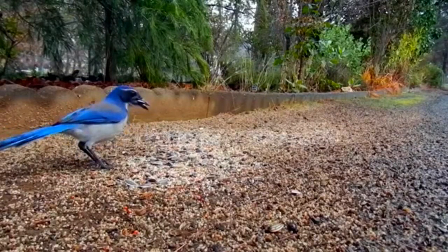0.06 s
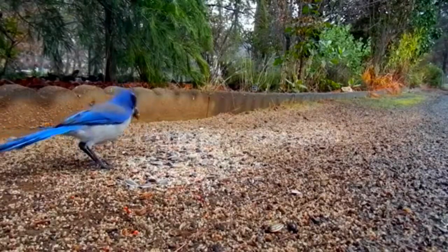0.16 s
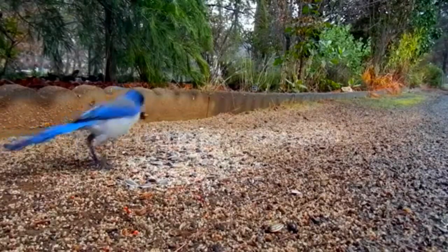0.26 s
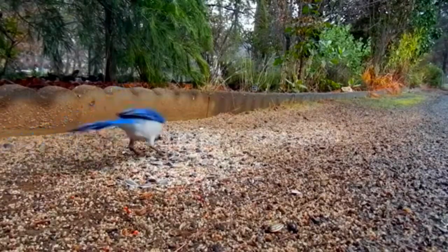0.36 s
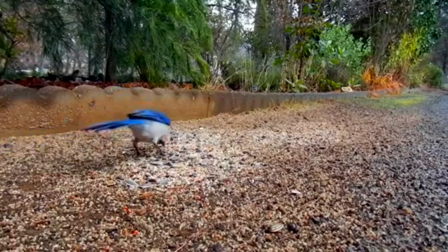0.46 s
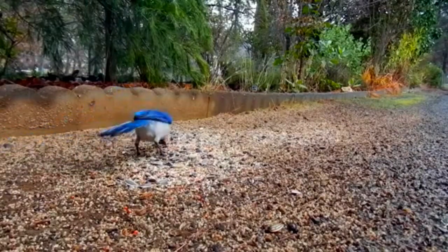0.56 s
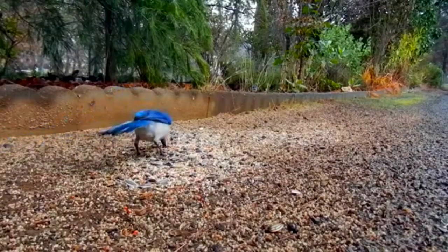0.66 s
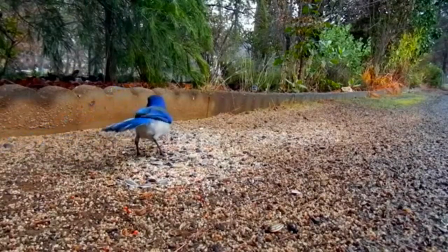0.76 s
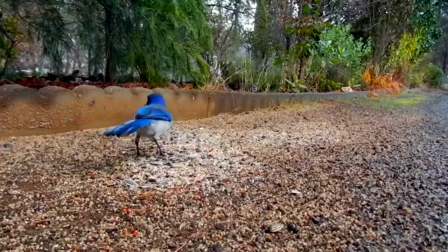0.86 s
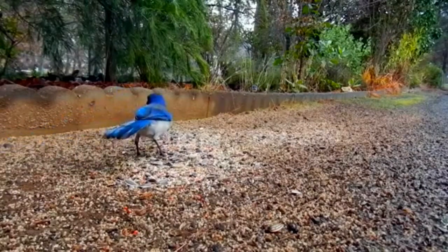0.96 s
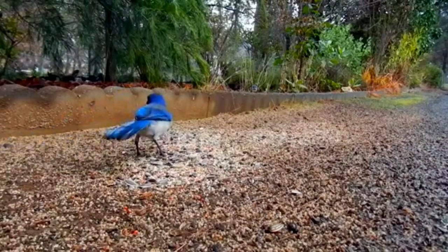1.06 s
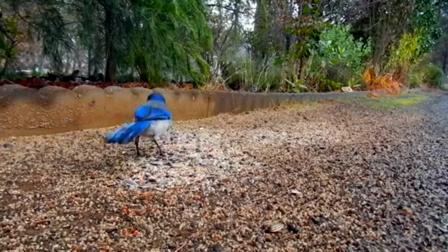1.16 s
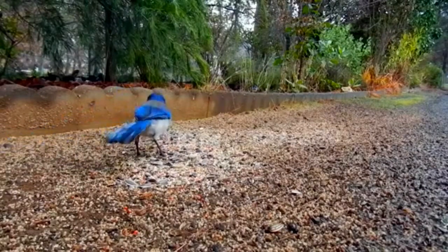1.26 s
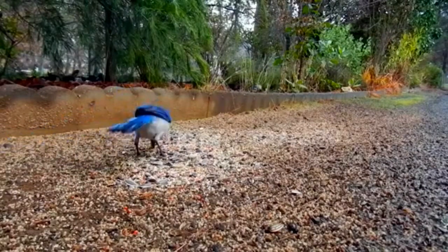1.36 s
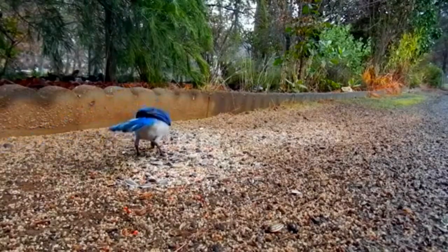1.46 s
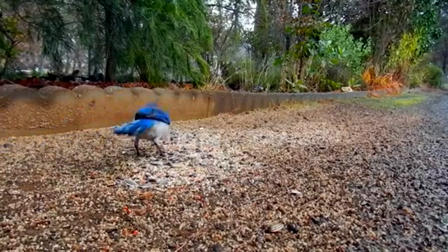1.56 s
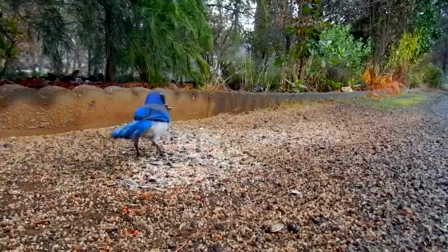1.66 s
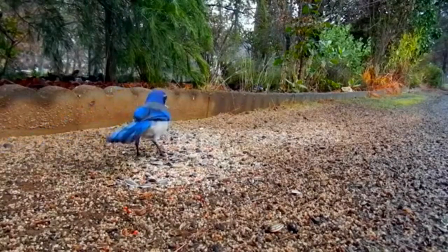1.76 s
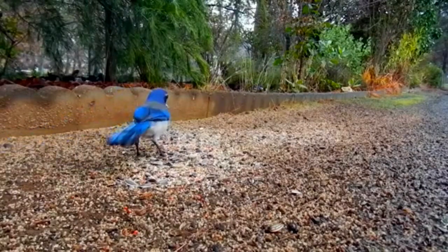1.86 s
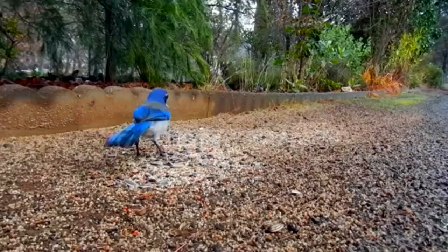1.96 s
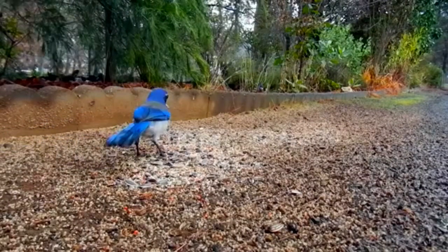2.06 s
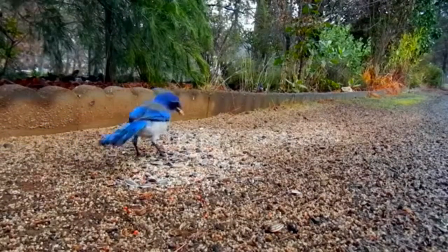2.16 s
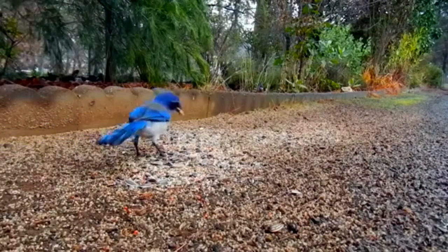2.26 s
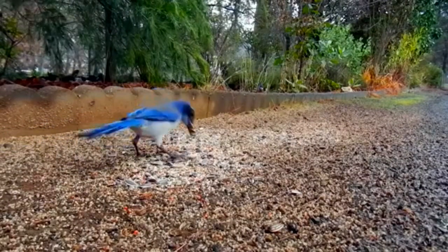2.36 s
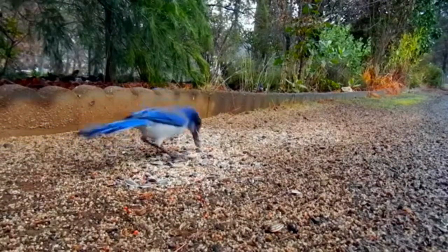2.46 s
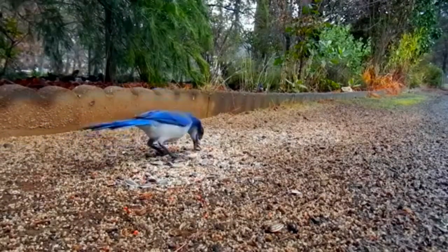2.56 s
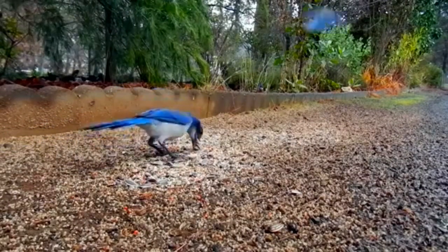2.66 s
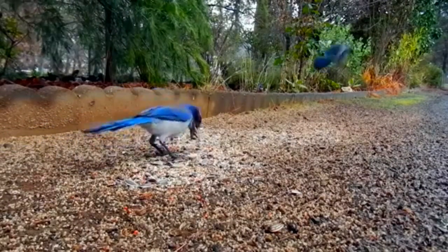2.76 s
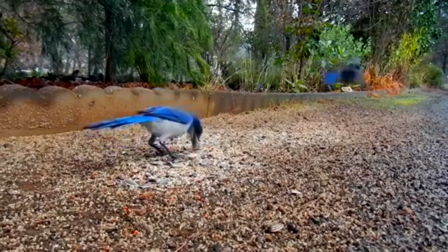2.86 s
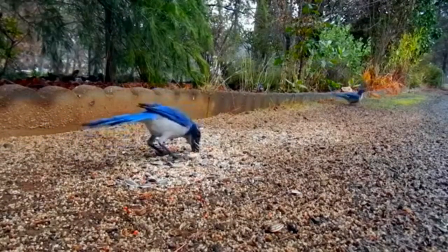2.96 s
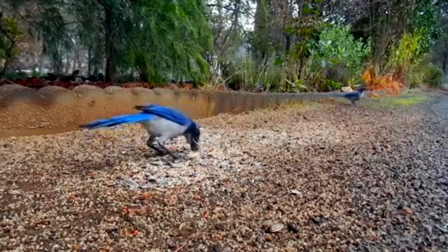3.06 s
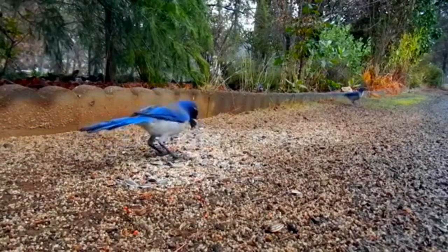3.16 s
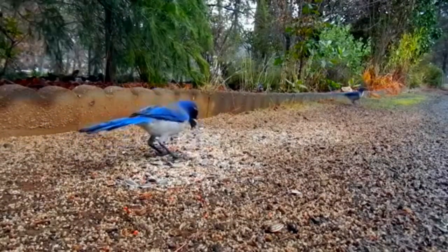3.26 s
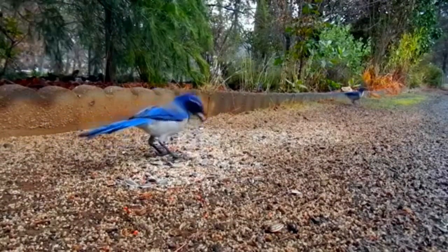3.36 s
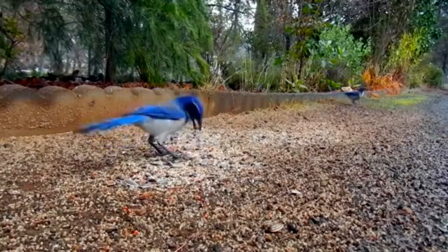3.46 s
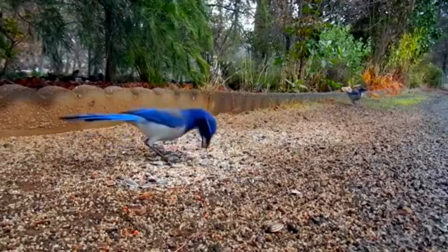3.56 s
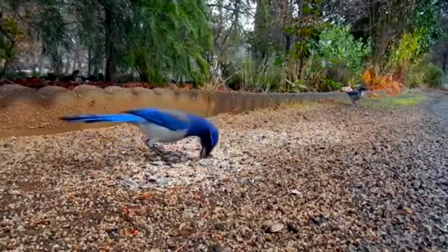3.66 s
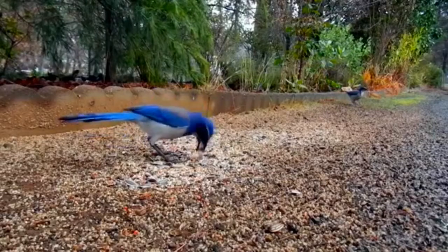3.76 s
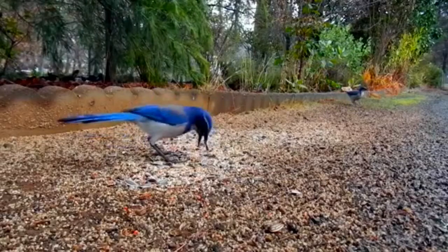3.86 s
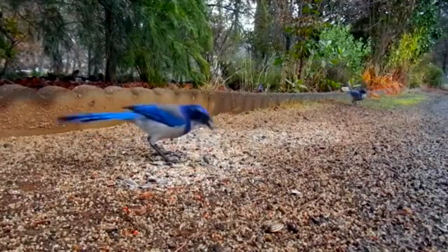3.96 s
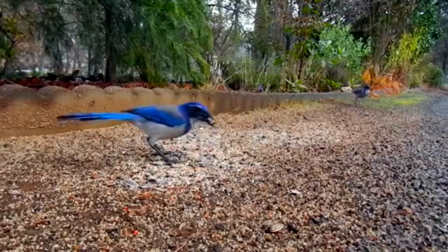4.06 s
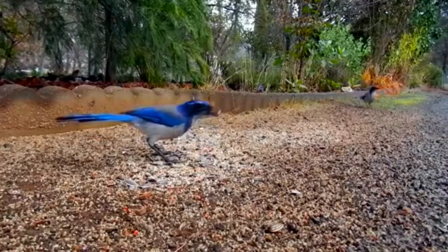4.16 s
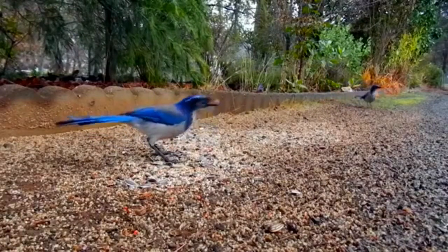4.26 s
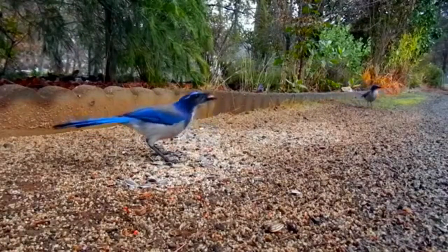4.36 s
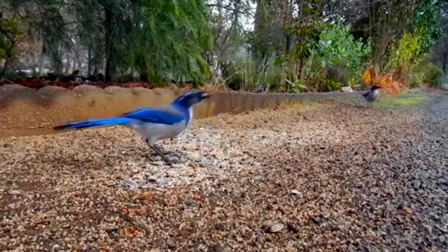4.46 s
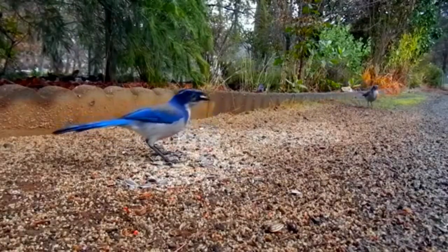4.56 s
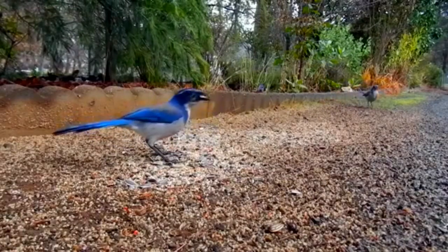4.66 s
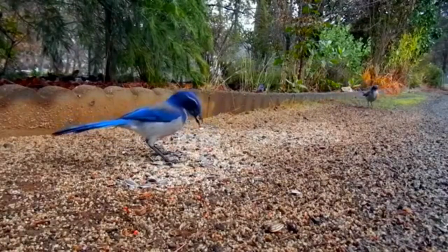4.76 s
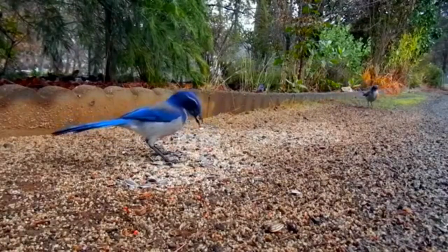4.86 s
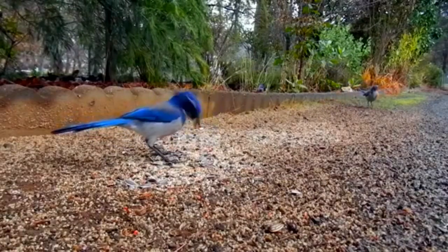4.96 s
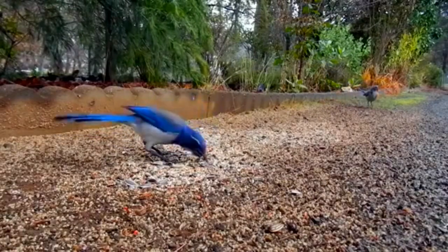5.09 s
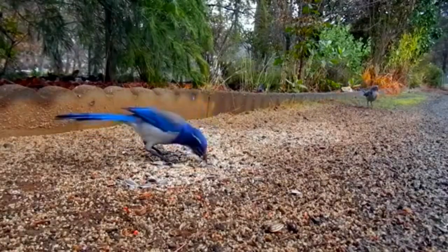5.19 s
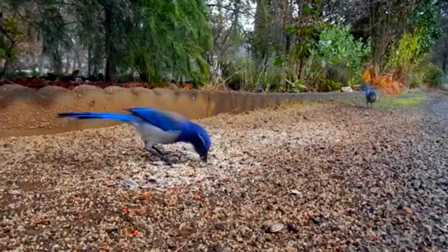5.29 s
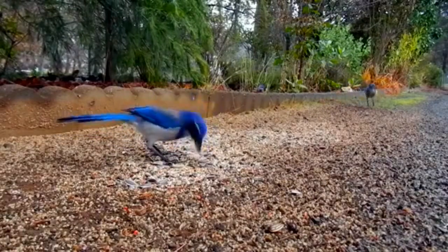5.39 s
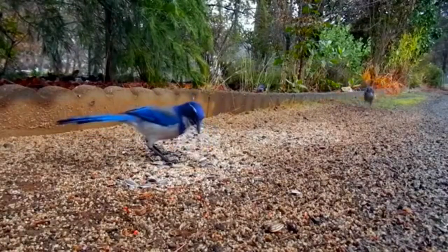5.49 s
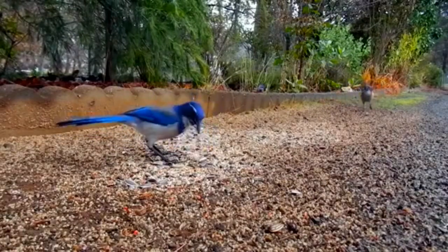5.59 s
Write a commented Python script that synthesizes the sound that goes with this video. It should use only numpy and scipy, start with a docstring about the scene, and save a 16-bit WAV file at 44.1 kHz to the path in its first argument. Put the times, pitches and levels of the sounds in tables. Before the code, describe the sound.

A small camera sits close to fine gravel outdoors, giving a thin stereo sound without bass or extreme treble. A steady wash of far traffic, faint rustle and camera hiss lasts about 5.6 seconds, swelling only slightly. After a quiet start, a jay's beak makes crisp, dry clicks from 0.4 to 0.8 seconds, slightly left, each with a tiny crunch of grit. A faint pip comes near 0.9. Another peck lands at 1.5, followed by small rising chips until 1.8. Loose grit shifts softly from 2.0 to 2.3, then clicks resume at 2.4 to 2.6, with a strong one at 2.9 and more at 3.1. Very high quick whistles with a hazy echo occur around 3.5. A busy flurry of ticks follows at 3.7, then scattered ones to 4.6. After a pause, a final tight cluster snaps at 5.2, now slightly right, leaving only background.

```python
"""On fine gravel, close to a small camera, a jay pecks seeds. Its beak clicks on stones and husks, made of
snaps, short damped rings and rough cracks, while swarms of tiny grains make the loose grit crunch.
Small birds in the trees give thin high whistles, made of sines, with a hazy, fluttering echo of noise bands.
Far traffic roars dully over a soft rustle, both shaped noise. The camera adds hiss and cuts bass and top."""
import sys
import numpy as np
from scipy import signal
from scipy.fft import rfft, irfft, next_fast_len
from scipy.io import wavfile
from scipy.ndimage import uniform_filter1d

SR = 44100
rng = np.random.default_rng(int(sys.argv[2]) if len(sys.argv) > 2 else 0)


def pcm_store(signal):
    """Save signal as 16-bit PCM."""
    levels = np.round(np.clip(np.atleast_2d(signal), -1, 1) * 32767)
    wavfile.write(sys.argv[1], SR, levels.astype(np.int16).T)


N = 248283  # length in samples

# Beak and stone contacts. Each row: start in seconds, peak level in dB before panning, ring pitch in Hz.
CONTACTS = [(.4178, -38, 2600), (.4287, -27.5, 7100), (.4288, -33, 5400), (.4291, -35, 3900),
            (.4306, -42, 9900), (.4338, -39, 6800), (.5131, -35, 3250), (.5185, -36, 4600),
            (.5257, -34, 2950), (.5385, -34.5, 3100), (.5407, -36, 2100), (.6649, -39, 2600),
            (.6673, -38, 2800), (.6744, -25, 4600), (.6754, -24.5, 3100), (.676, -25.5, 3700),
            (.6773, -31, 2200), (.6836, -39, 6000), (.7636, -35, 5500), (.7648, -23, 6900),
            (.7649, -19.5, 4770), (.7651, -28, 3200), (1.46, -33, 6000), (1.4612, -34, 4500),
            (1.4613, -35, 9900), (1.4704, -24.5, 2250), (1.4705, -35, 5500), (1.4729, -24.5, 2050),
            (1.473, -35, 5000), (2.003, -40, 4200), (2.3868, -31, 7340), (2.4331, -23.5, 6400),
            (2.4345, -24, 6200), (2.4349, -30, 3600), (2.437, -25, 5000), (2.4424, -32, 5200),
            (2.5557, -24, 4800), (2.5561, -36, 10000), (2.5613, -31, 4000), (2.6135, -37, 3500),
            (2.9393, -21, 4200), (2.9393, -35, 9900), (2.9403, -21, 3100), (2.9407, -31, 5500),
            (2.9415, -27, 2400), (2.9442, -28, 4100), (3.072, -33, 4500), (3.0744, -35, 4200),
            (3.081, -25, 3800), (3.0808, -36, 9900), (3.0822, -34, 2300), (3.2103, -42, 7100),
            (3.2245, -39, 5570), (3.2422, -36.5, 7000), (3.657, -39, 3880), (3.7258, -35, 5260),
            (3.7263, -41, 10000), (3.7332, -35, 4480), (3.739, -31, 4070), (3.7403, -33, 6200),
            (3.7413, -28, 6300), (3.7418, -37, 2300), (3.7452, -30.5, 4950), (3.7455, -37, 2310),
            (3.7482, -34, 3120), (3.7541, -39, 2470), (3.7688, -40, 4800), (3.9016, -36.5, 3300),
            (3.919, -25, 10000), (3.9193, -32, 2800), (3.9195, -41, 6000), (4.0291, -25, 4870),
            (4.0292, -30, 6500), (4.0296, -33, 9800), (4.0345, -37, 4400), (4.0348, -35, 10100),
            (4.0407, -41, 3350), (4.1366, -44, 7060), (4.3968, -37, 6000), (4.3969, -37, 9900),
            (4.4085, -32.5, 6600), (4.4085, -35, 9800), (4.41, -38, 6300), (4.5466, -45, 9500),
            (4.5582, -31, 7000), (4.5581, -33, 9400), (4.568, -42, 6600), (5.2199, -25, 6400),
            (5.2207, -29, 9900), (5.2211, -30, 4540), (5.2223, -34, 6300), (5.2292, -28.5, 3900),
            (5.2296, -31, 6700), (5.2302, -32, 3000), (5.2303, -33, 9900), (5.2341, -36, 3800),
            (5.2526, -43, 6800)]


def amp(db):
    """Turn decibels into a plain gain."""
    return 10 ** (np.asarray(db) / 20)


def unit(x):
    """Scale x to an average (rms) level of 1."""
    return x / np.sqrt(np.mean(x ** 2) + 1e-20)


def along(points, hz):
    """Read a curve of (Hz, value) points at any frequency, on a log pitch axis."""
    f, v = np.transpose(points)
    return np.interp(np.log(hz + 1), np.log(f + 1), v)


def curves(rows):
    """Draw each column after the time as a curve with one value per sample."""
    seconds, *columns = np.transpose(rows)
    return [np.interp(np.arange(N) / SR, seconds, column) for column in columns]


def filtered(x, response):
    """Multiply the spectrum of x by a response, given as a function of frequency in Hz."""
    m = next_fast_len(x.shape[-1] + 8192)  # spare room for the filter's tail
    spectrum = rfft(x, m) * response(np.fft.rfftfreq(m, 1 / SR))
    return irfft(spectrum, m)[..., :x.shape[-1]]


def add(track, s, x):
    """Mix x into the track from time s in seconds."""
    start = round(s * SR)
    track[..., start:start + x.shape[-1]] += x


def rush(spectrum, alike, patchy_db):
    """Stereo noise of rms 1, with patches of random gain over time and pitch."""
    noise = signal.stft(rng.standard_normal((2, N)), nperseg=512)[2]
    patches = rng.standard_normal(noise.shape[1:])
    patches = uniform_filter1d(patches, size=6, axis=0)  # smooth across pitch
    patches = uniform_filter1d(patches, size=8, axis=1)  # smooth across time
    pair = signal.istft(noise * amp(patchy_db * unit(patches)), nperseg=512)[1][:, :N]

    def mid_side_gain(hz):
        # more side and less mid makes left and right less alike
        turn = np.arccos(np.clip(along(alike, hz), -1, 1)) / 2
        return amp(along(spectrum, hz)) * [np.cos(turn), np.sin(turn)]

    mid, side = filtered(pair, mid_side_gain)
    return unit(np.array([mid + side, mid - side]))


def scatter(x, t60, db):
    """Add a diffuse answer from the surroundings: fading noise, different at each sound inlet."""
    t = np.arange(SR // 4) / SR
    tail = rng.standard_normal((2, len(t))) * amp(-60 * t / t60)  # t60: seconds to fall by 60 dB
    answer = signal.fftconvolve(x, tail / np.linalg.norm(tail[0]), axes=1)[:, :N]
    return x + amp(db) * answer


def late_left(x):
    """Delay the left inlet by 30 microseconds, so the right one hears central sounds first."""
    delay_s = np.array([[3e-5], [0]])
    return filtered(x, lambda hz: np.exp(-2j * np.pi * hz * delay_s))


def air():
    """Far traffic and a rustle of feathers and leaves: noise a little louder on the left, swelling and sinking."""
    # Each row: time in seconds, roar level in dB, rustle level in dB.
    air_levels = [(0.0, -43, -77), (0.19, -43.5, -66.5), (0.55, -43, -60), (1.02, -45, -71.5),
                  (1.3, -44.5, -65), (1.61, -45.5, -63), (1.98, -44.5, -64), (2.16, -44.5, -57),
                  (2.79, -45.5, -59.5), (3.06, -45, -62.5), (3.62, -45.5, -61), (4.06, -45.5, -65.5),
                  (4.94, -47, -67.5), (5.35, -45.5, -59.5), (5.63, -47.5, -65.5)]
    # Spectra of the roar and the rustle. Each row: pitch in Hz, noise level in dB per Hz.
    roar_spectrum = [(500, 4.5), (1500, -1), (1750, -0.5), (2200, -3.5), (3000, -11.5), (4500, -13.5),
                     (8000, -33.5)]
    rustle_spectrum = [(1500, -15), (3000, 0), (5000, 0.4), (7500, 2.5), (11000, -4.5), (13000, -70)]
    # Each row: pitch in Hz, likeness of left and right in the roar (1 is identical).
    roar_likeness = [(600, 0.64), (1100, .75), (2500, 0.36), (5000, 0.16)]
    roar_db, rustle_db = curves(air_levels)
    roar = late_left(rush(roar_spectrum, roar_likeness, patchy_db=1.41))
    rustle = rush(rustle_spectrum, [(3000, 0.0082)], patchy_db=5.5)
    roar_gain = amp(roar_db + np.array([[1.1], [-1.1]]))
    rustle_gain = amp(rustle_db + np.array([[1.2], [-1.2]]))
    return roar_gain * roar + rustle_gain * rustle


def whistle(pitch_hz, length, peaky, lead):
    """A sine gliding from its start pitch through its lowest to its end, swelling and fading once."""
    start_hz, low_hz, end_hz = pitch_hz
    u = np.linspace(0, 1, round(length * SR))  # progress through the note
    glide_hz = np.interp(u, [0, .2, .35, .7, 1], [start_hz, low_hz, low_hz, .96 * end_hz, end_hz])
    phase = 2 * np.pi * np.cumsum(glide_hz) / SR
    swell = np.abs(np.sin(np.pi * u)) ** peaky
    return swell * np.sin(phase + [[lead], [0]])  # the left phase leads


def whistles():
    """Chips that dip before sweeping steeply up, and short whistles: nearly level pips and fast upward sweeps."""
    # Each row: start in seconds, level in dB, lowest pitch in Hz, end pitch in Hz, length in seconds.
    dipping_chips = [(1.5505, -45, 6900, 10000, .018), (1.626, -46, 7200, 9950, .025),
                     (1.802, -54, 6800, 8700, .016)]
    # Nearly level pips near 7 kHz and fast upward sweeps to about 11 kHz.
    # Each row: start in seconds, level in dB, start pitch in Hz, end pitch in Hz, length in seconds,
    # how far the left phase leads in radians.
    pips_and_sweeps = [(.866, -54, 7050, 6950, .011, 2.4), (3.4725, -41, 6750, 6900, .017, 2.6),
                       (3.479, -50, 9900, 10700, .008, 1), (3.4835, -30, 9000, 11000, .009, 2),
                       (3.4915, -45, 9300, 10800, .009, 1.2), (3.537, -42.5, 7000, 7000, .017, 2.6),
                       (3.546, -42, 9000, 11000, .009, 1.7), (3.549, -36, 9000, 11000, .009, 1.8)]
    track = np.zeros((2, N))
    for s, db, low_hz, end_hz, length in dipping_chips:
        add(track, s, amp(db) * whistle((1.15 * low_hz, low_hz, end_hz), length, peaky=.6, lead=2.7))
    for s, db, start_hz, end_hz, length, lead in pips_and_sweeps:
        add(track, s, amp(db) * whistle((start_hz, start_hz, end_hz), length, peaky=3.5, lead=lead))
    return track


def hazy_echo():
    """Hazy, fluttering echo of the whistles among the trees: a narrow and a wider band of noise."""
    # Each row: start in seconds, lower band level in dB, lower band pitch in Hz, length in seconds,
    # upper band level against the lower in dB, how far the left phase leads in radians.
    echo_bands = [(0.86, -59.5, 7000, 0.079, -5, 1.4), (2.495, -61.5, 6700, 0.065, -14, 2.6),
                  (3.41, -61, 6900, 0.019, -14, 1.7), (3.465, -59.5, 6880, 0.07, 0, 1.4),
                  (3.531, -58.5, 7080, 0.055, 1.5, 1.3)]
    flutter_hz, flutter_depth = 114, .3
    lower_width_hz, upper_hz, upper_width_hz = 400, 9600, 2100
    track = np.zeros((2, N))
    for s, db, lower_hz, length, upper_db, lead in echo_bands:
        t = np.arange(round(length * SR)) / SR
        flutter = 1 - flutter_depth * np.cos(2 * np.pi * flutter_hz * t)
        swell = np.sin(np.pi * (t / length) ** .7) ** .6
        bands = [(db, lower_hz, lower_width_hz), (db + upper_db, upper_hz, upper_width_hz)]
        for level_db, mid_hz, width_hz in bands:
            band = lambda hz: np.exp(-((hz - mid_hz) / width_hz * 2) ** 2 + 1j * np.array([[lead], [0]]))
            noise = filtered(rng.standard_normal(SR // 5), band)[:, :len(t)]
            add(track, s, amp(level_db) * unit(noise) * flutter * swell)
    return track


def songbirds():
    """Whistles and their hazy echo, placed aside by left-right phase, with a short tail from the trees."""
    return scatter(whistles() + hazy_echo(), t60=.15, db=-9)


def crunch(cycles=1.8, size_db=3, density_hz=6000):
    """Grit shifting under beak and feet: swarms of tiny grains, a few cycles each, scattered in pitch."""
    # Each row: time of the peak in seconds, level in dB before panning, grain pitch in Hz, fall in seconds.
    grit_swarms = [(.428, -54, 6900, .018), (.525, -48, 4200, .021), (.522, -57, 9700, .015),
                   (.589, -56, 7070, .0076), (.676, -45, 3300, .011), (.767, -48, 5600, .02),
                   (1.462, -45.5, 5000, .006), (1.474, -45, 4000, .012), (1.976, -50, 5200, 0.039),
                   (2.011, -50, 4470, 0.019), (2.06, -52, 5120, 0.025), (2.05, -55, 9500, 0.094),
                   (2.117, -55, 9660, 0.038), (2.124, -59.5, 4680, 0.017), (2.224, -50, 5200, 0.012),
                   (2.266, -51.5, 9700, 0.02), (2.389, -55, 7100, .0044), (2.435, -46, 5000, .017),
                   (2.558, -46.5, 3900, .024), (2.562, -56, 9800, .012), (2.615, -51.5, 3830, .011),
                   (2.792, -52.5, 3440, .038), (2.943, -41, 4200, .005), (3.078, -46, 3800, .021),
                   (3.211, -55, 7000, .0054), (3.282, -54, 6450, .0096), (3.654, -50, 4800, .017),
                   (3.743, -45.5, 4940, .016), (3.767, -50.5, 5000, .0088), (3.903, -53.5, 3300, .009),
                   (3.924, -52, 2900, .007), (3.926, -55, 9500, .014), (4.03, -52, 5500, .0046),
                   (4.157, -54, 3000, .0026), (4.404, -53, 6600, .011), (4.56, -55.5, 7000, .02),
                   (5.213, -51, 6130, .013), (5.224, -45, 5500, .005), (5.233, -47, 5000, .009)]
    rise_share = .62  # rise time over fall time
    spread_hz = 3200  # pitch spread in octaves is this over the grain pitch: fine grit is more even
    track, t = np.zeros((2, N)), np.arange(96) / SR
    for s, db, hz, fall in grit_swarms:
        rise = rise_share * fall
        when, side = rng.random((900, 2)).T
        pitch, size = rng.standard_normal((900, 2)).T
        at = when * len(when) / density_hz - 2 * rise  # seconds from the peak
        swell = np.exp(-np.where(at < 0, -at / rise, at / fall) ** 2.4)
        grain_hz = np.clip(hz * 2 ** (spread_hz / hz * pitch), 1500, 10400)[:, None]
        life = t * grain_hz / cycles
        grains = np.sin(2 * np.pi * grain_hz * t) * life * np.exp(-2 * life)
        # short high grains are struck harder, so every pitch carries like energy
        grains = grains * np.sqrt(grain_hz / hz)
        # even out the swarm to rms 1 before its gains
        grains = grains / np.sqrt(density_hz / SR * np.mean(np.sum(grains ** 2, axis=1)))
        gain = amp(db + size_db * np.clip(size, -2, 2)) * swell
        first = np.round((s + at) * SR).astype(int)
        index = (first[:, None] + np.arange(len(t))).ravel()
        # each grain leans to one side by chance
        for ear, turn in enumerate((side, 1 - side)):
            placed = grains * (gain * (0.41 + turn))[:, None]
            track[ear] += np.bincount(index, placed.ravel(), N + SR)[:N]
    return track


def rattles():
    """Each struck stone rattles on: a softer, longer contact soon after, at a slightly different pitch."""
    delay_s, level_db, scatter_octaves, times_longer = .001, -13, .2, 2.2  # the delay varies by chance
    luck = rng.standard_normal((len(CONTACTS), 2))
    rows = []
    for (s, db, hz), (late, pitch) in zip(CONTACTS, luck):
        rattle_s = s + delay_s * np.exp(0.33 * late)
        rattle_hz = min(hz * 2 ** (scatter_octaves * pitch), 10000)
        rows.append((rattle_s, db + level_db, rattle_hz, times_longer))
    return rows


def clicks():
    """Each contact is a brief snap, a few damped cycles of stone or husk, and a rough crack of noise."""
    ring_s, ring_slope = 0.0031, 0.35  # seconds to fall 60 dB at 4.5 kHz, how fast it shortens with pitch
    snap_level, crack_level = 0.55, 0.55  # against the ring
    track, t = np.zeros(N), np.arange(600) / SR
    for s, db, hz, longer in [(*contact, 1) for contact in CONTACTS] + rattles():
        t60 = longer * ring_s * (4500 / hz) ** ring_slope
        near_pitch = lambda f: np.exp(-np.log2((f + 1) / hz) ** 2 / .5)
        crack = unit(filtered(rng.standard_normal(len(t)), near_pitch))
        fade = amp(-60 * t / t60) * (1 - np.exp(-t * hz / 0.72))  # builds up within about a cycle
        ring = (np.sin(2 * np.pi * hz * t) + crack_level * crack) * fade
        snap = np.sin(2 * np.pi * 1.15 * hz * t) * 2.1 * np.exp(-t * hz / .45)
        sound = ring + snap_level * snap
        add(track, s, amp(db) * sound / np.abs(sound).max())
    return track


def jay():
    """Clicks and crunches move from left of centre to the right; rough ground and kerb scatter them quickly."""
    # Each row: time in seconds, left level over right in dB.
    left_over_right = [(0, 4.5), (1.5, 1.4), (3, 1.5), (4, 1), (5.63, -3.5)]
    pan_db = curves(left_over_right)[0]
    near = (clicks() + crunch()) * amp([pan_db / 2, -pan_db / 2])
    return scatter(late_left(near), t60=0.035, db=-11)


def scene():
    """Everything that reaches the camera."""
    return air() + songbirds() + jay()


def record(dry):
    """The inlets colour the sound, the amplifiers add largely separate hiss, and the camera cuts bass and top."""
    # Colour of the sound inlets. Each row: pitch in Hz, gain in dB.
    inlet_colour = [(7300, 0), (8300, -7), (9100, -6), (10100, 4)]
    # Spectrum of the hiss. Each row: pitch in Hz, noise level in dB per Hz.
    hiss_spectrum = [(1000, -1.5), (3000, 7.5), (5000, -2.5), (7500, 0.5), (11000, -3), (13000, -69.5)]
    # Response of the camera's microphone. Each row: pitch in Hz, gain in dB.
    mic_response = [(300, -61.5), (620, -54.5), (720, -43.5), (800, -38), (1150, -15), (1550, -1),
                    (2000, -1), (10300, 4.5), (10450, -15.5), (10700, -42), (11300, -59)]
    top_hz = 11500  # nothing passes from here up
    heard = filtered(dry, lambda hz: amp(along(inlet_colour, hz)))
    hiss = amp(-59.5) * rush(hiss_spectrum, [(3000, 0.22)], patchy_db=2.0)
    return filtered(heard + hiss, lambda hz: amp(along(mic_response, hz)) * (hz < top_hz))


dry = scene()
out = record(dry)
pcm_store(out)
```